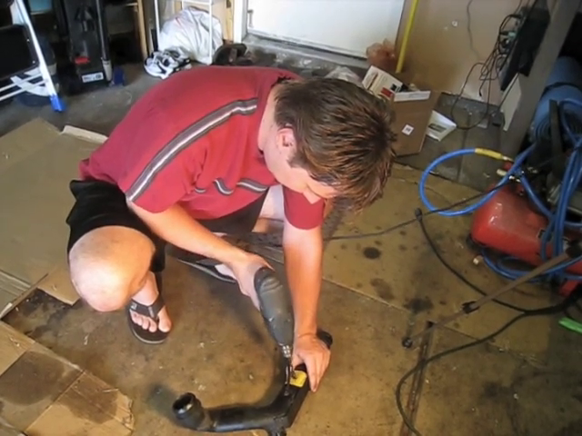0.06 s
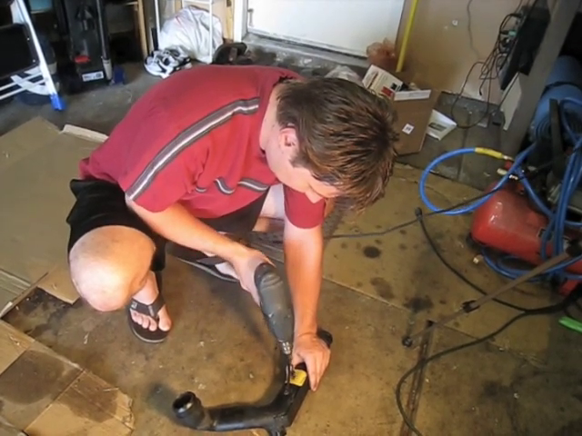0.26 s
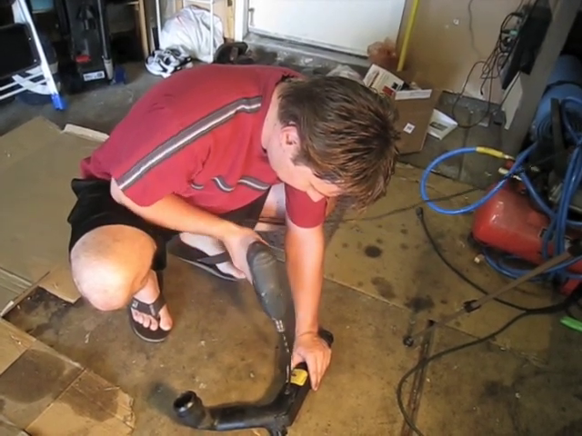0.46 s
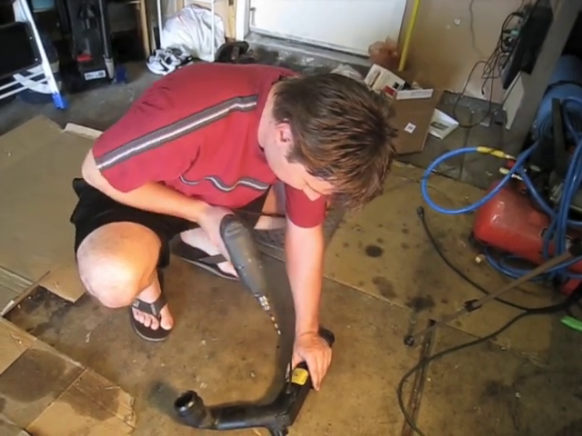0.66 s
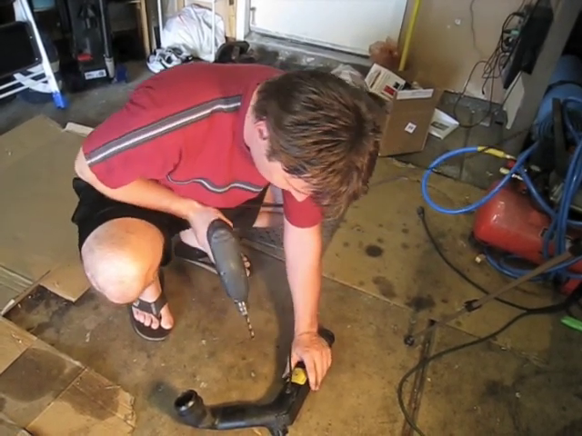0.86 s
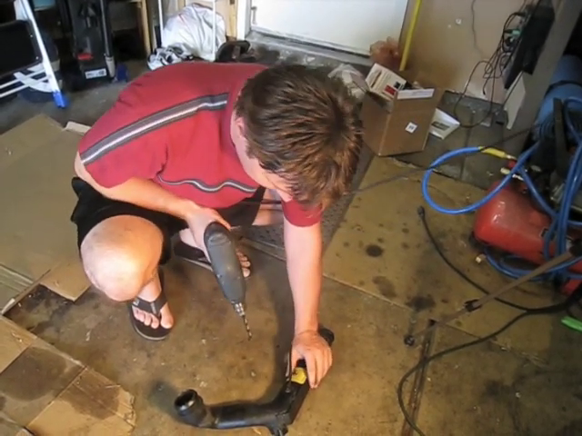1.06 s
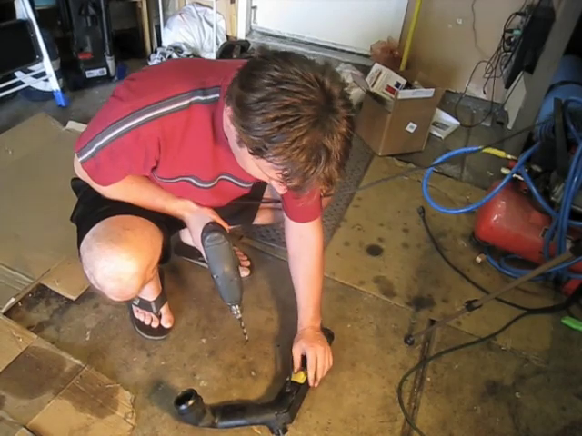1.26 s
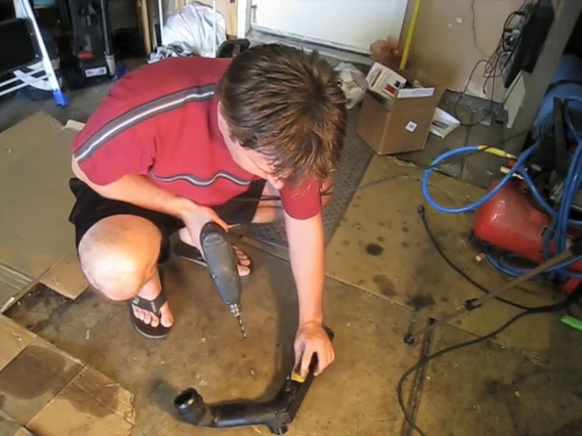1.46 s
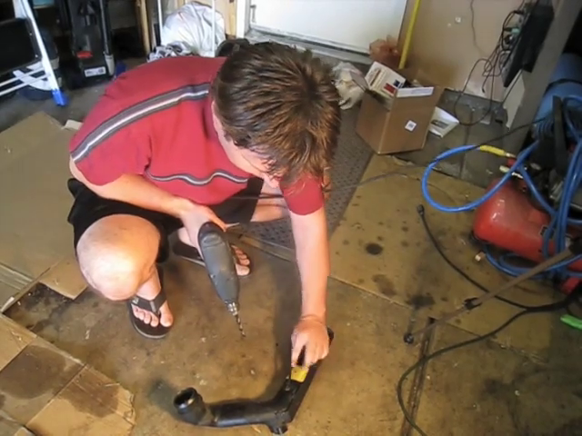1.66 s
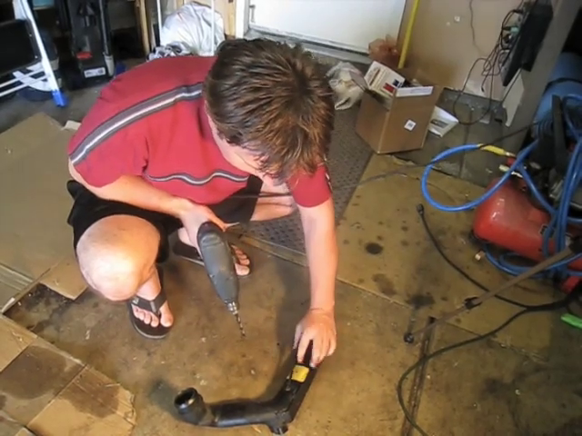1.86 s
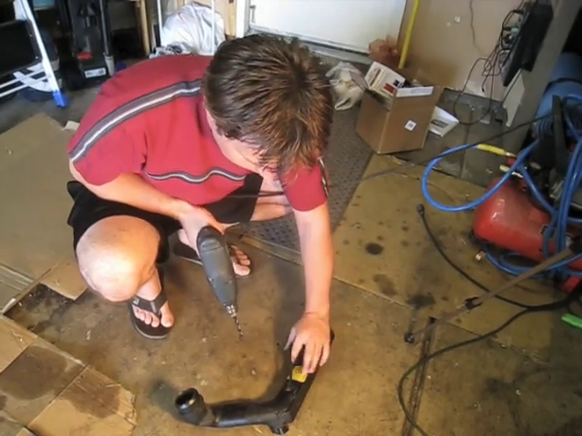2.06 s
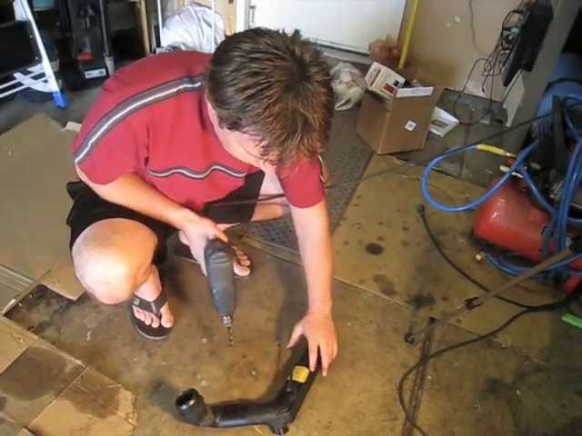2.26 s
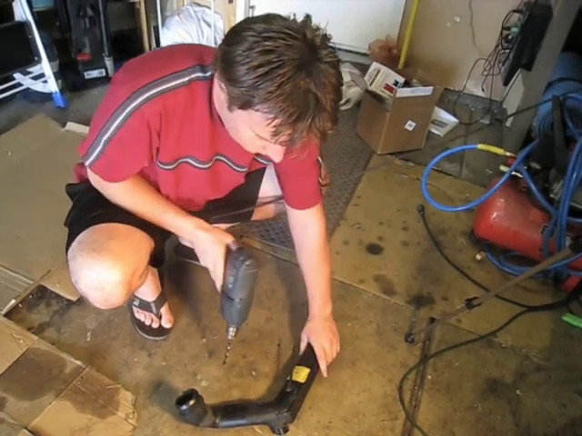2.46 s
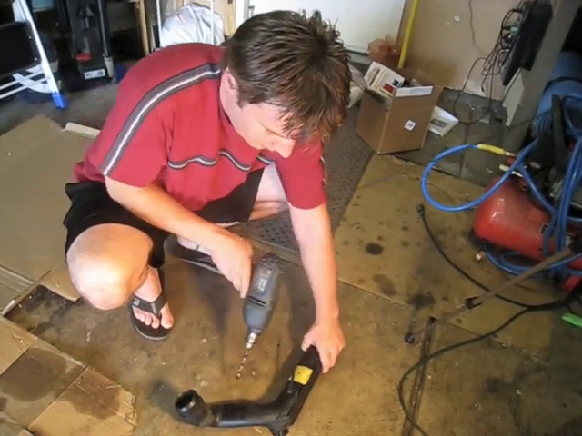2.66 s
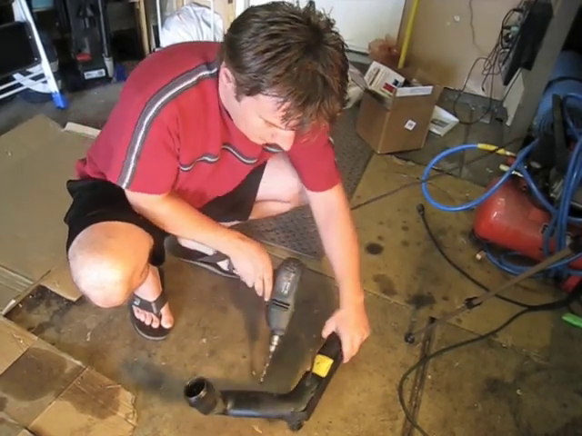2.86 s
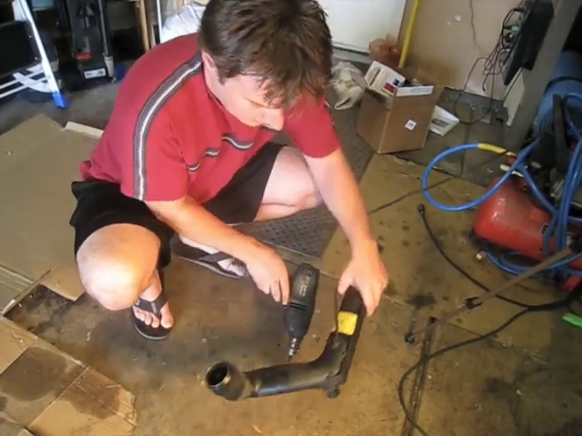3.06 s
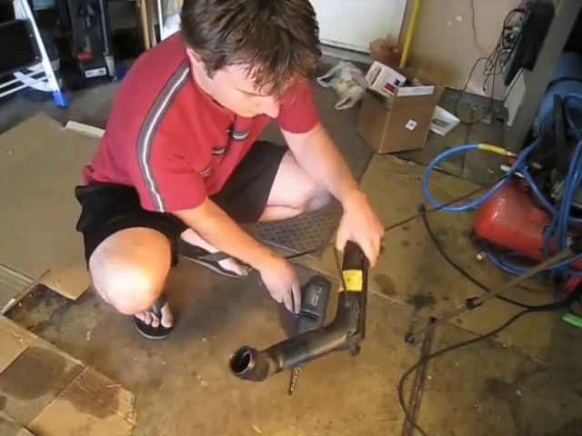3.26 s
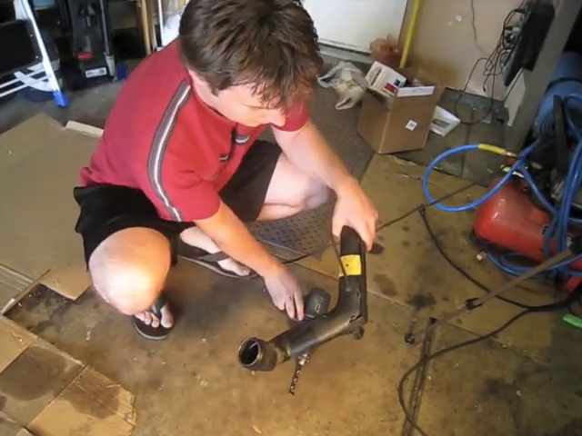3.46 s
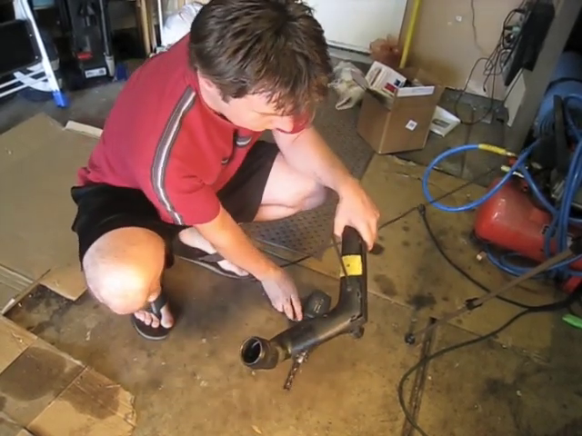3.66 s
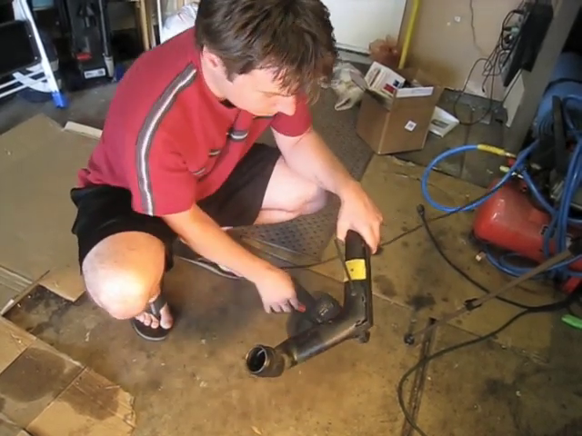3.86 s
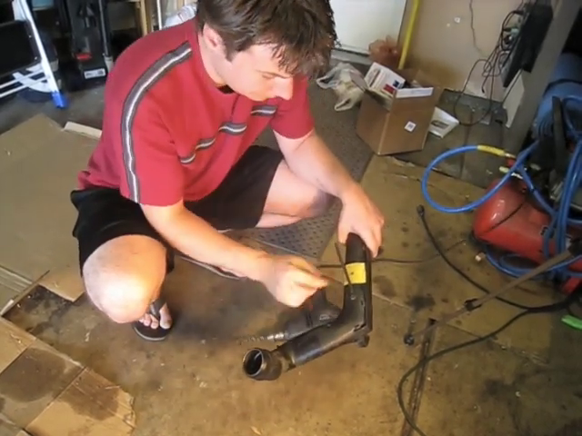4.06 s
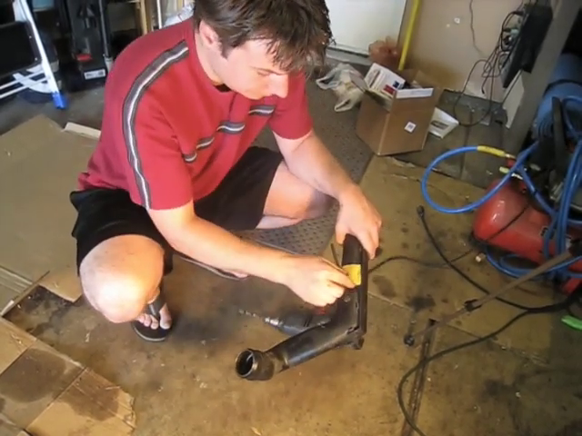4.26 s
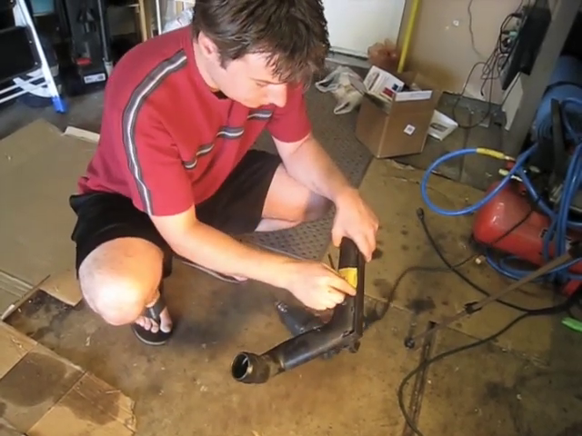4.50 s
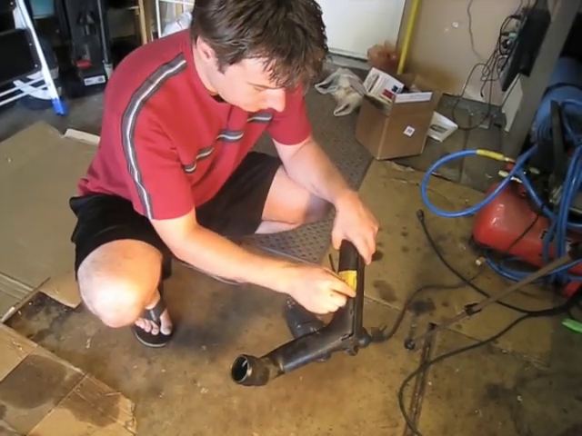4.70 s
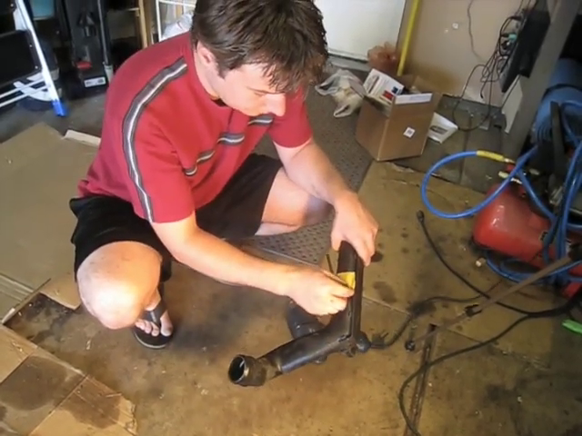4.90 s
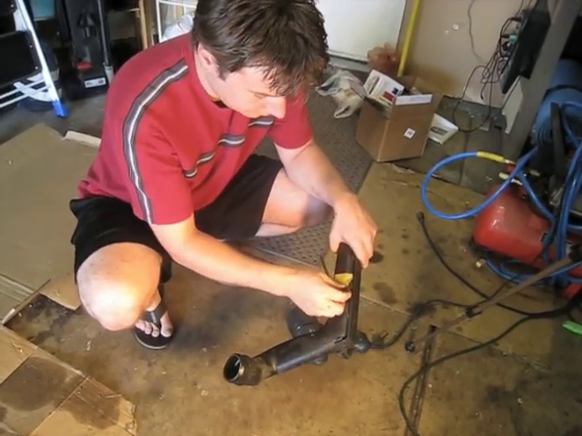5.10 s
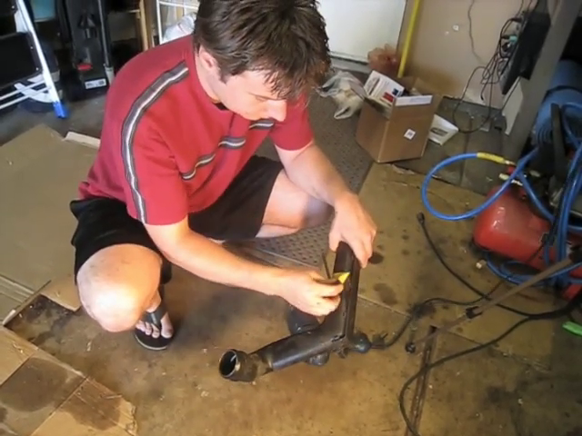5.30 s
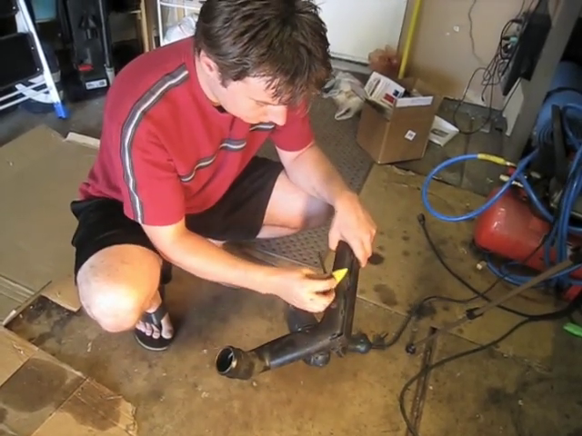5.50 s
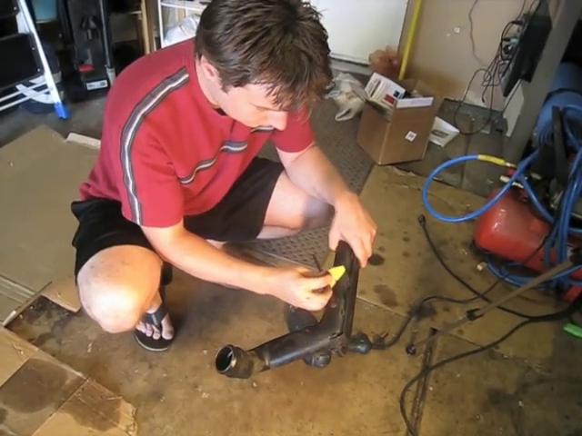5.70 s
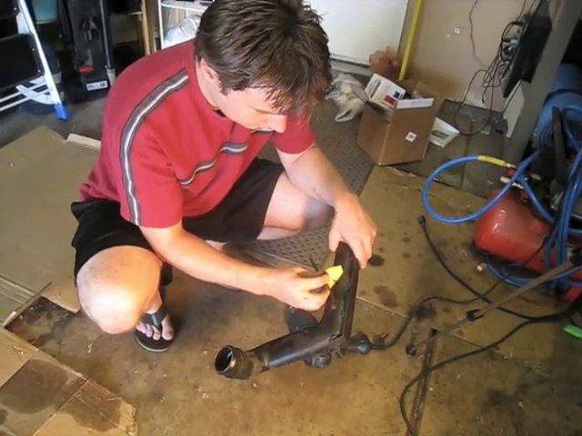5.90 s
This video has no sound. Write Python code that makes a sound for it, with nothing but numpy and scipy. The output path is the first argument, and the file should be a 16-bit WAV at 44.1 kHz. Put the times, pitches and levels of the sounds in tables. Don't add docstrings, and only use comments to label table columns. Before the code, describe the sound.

An electric drill whines and rattles, races free and coasts down, then is set on concrete with clatter before a hollow plastic pipe knocks and scrapes.

```python
import sys
import numpy as np
from scipy import signal
from scipy.io import wavfile

SR = 44100
rng = np.random.default_rng(int(sys.argv[2]) if len(sys.argv) > 2 else 0)


def unload_wav(signal):
    wavfile.write(
        sys.argv[1],
        SR,
        np.round(np.clip(np.atleast_2d(signal).T, -1, 1) * 32767).astype(np.int16),
    )


def how_loud(loudness_db):
    steps = np.asarray(loudness_db, float) / 20
    return 10 ** steps


N = 261954

# (time [s], level [dB])
DRILL_LEVEL = [
    (0.0, -23),
    (0.052, -24),
    (0.07, -19.5),
    (0.154, -19),
    (0.438, -24.5),
    (0.654, -29.5),
    (0.838, -31.5),
    (0.994, -43),
    (1.12, -63),
]
# (time [s], loss [dB], half width [s])
BIT_SNAGS = [
    (0.132, 3.7, 0.0095),
    (0.438, 1.45, .01),
    (.52, -2.5, 0.054),
]
# (multiple of tooth rate [1], level [dB])
TOOTH_HARMONICS = [(1, 0), (2, -1.5), (4, -2), (5, 4), (6, 2), (7, 2), (8, 2.5), (9, 0), (10, -6), (11, 0),
                   (12, 6.5), (13, 0.5), (14, 2), (15, -3), (16, -6), (18, -5), (20, 7)]
# (frequency [Hz], response [dB])
CASING_RADIATION = [(450, -26), (980, 1.5), (1500, -19), (2350, 9.5), (3400, 5.5), (3950, 0.5), (4800, 10),
                    (6800, -2.5), (10000, -9), (14000, -22)]
# (frequency [Hz], width [Hz], level [dB])
CASING_MODES = [(972, 46, -6), (1420, 45, -8), (2530, 60, -0.5), (3116, 16, 6.5), (4480, 83, 6),
                (4930, 43, -17.5), (5670, 130, -18.5), (6540, 59, -16), (7700, 61, -9), (9600, 78, -3.5),
                (11270, 210, 2.5)]
# (frequency [Hz], density [dB per Hz])
GEAR_SPECTRUM = [(88, -60), (150, -46.5), (352, -18.5), (786, -15), (969, -12), (1310, -3), (1780, -5.5),
                 (2460, 1), (4680, -3), (7000, -37.5), (9100, -32), (15400, -120)]
# (frequency [Hz], density [dB per Hz])
FAN_SPECTRUM = [(2940, -10.5), (5000, -3.5), (5940, 1.5), (6660, -6), (7190, -5), (11600, -7.5),
                (15100, -10), (15700, -21)]

# (frequency [Hz], level [dB], t60 [s])
TOOL_MODES = [(1541, -8, 0.012), (2220, -19.5, 0.019), (2520, -8, 0.0154), (2950, -3.5, .018),
              (3400, -6.5, 0.0127), (4230, 7, 0.015), (4567, -3, 0.0254), (4728, -4, 0.028)]
# (frequency [Hz], level [dB], t60 [s])
CHUCK_MODES = [(6029, -2, .02), (7214, -2, .02), (7607, -2, .02), (8258, -6, .015), (9860, -5, .015),
               (10310, -3, .015), (11470, -5, .012), (11900, -6, .012)]
# (frequency [Hz], level [dB], t60 [s])
PIPE_MODES = [(460.5, 3, 0.0395), (642, -6, 0.039), (885, -17.5, 0.0095), (1020, 10, 0.0276),
              (1205, -0.5, 0.0106), (1295, -17, .02), (1470, -24.5, 0.013)]
# (frequency [Hz], level [dB], t60 [s])
AIR_MODES = [(145, 0.5, 0.139), (284.2, -9, 0.18)]

# (time [s], peak level [dB], air-column thud [dB])
TOOL_DOWN = [
    (3.3081, -11, -51),
    (3.3659, -13, -53),
    (3.3775, -29, -55),
    (3.397, -17, -53),
    (3.4198, -28, -58),
]
PIPE_RATTLE = [
    (3.5239, -3, -49),
    (3.552, -13, -37),
    (3.561, -15.5, -30.5),
    (3.567, -13, -25.5),
    (3.5842, -27, -36),
]
PIPE_END = [
    (3.7521, -19.5, -47),
    (3.7637, -21.5, -28.5),
    (3.7785, -26, -34),
    (3.7949, -26.5, -38),
    (3.932, -21, -31),
    (3.9451, -18.5, -43),
    (3.9605, -27, -34.5),
]
HAND_TAPS = [
    (2.2662, -44, -62.5),
    (2.3567, -47, -65),
    (2.4544, -36, -59),
    (4.4923, -30, -56.5),
    (4.5154, -31.5, -45.5),
    (4.611, -26, -51.5),
    (4.6233, -31, -42),
    (4.798, -37, -52),
]
TICKS = [
    (3.3128, -21, -55),
    (3.537, -24.5, -25),
    (3.714, -32.5, -53),
    (4.002, -34, -60),
]
BIT_SNAPS = [
    (.295, -13.5, -66.5),
    (.36, -16.5, -53),
    (.458, -13.5, -62),
]
# (chuck level [dB], pipe wall level [dB])
OBJECT_COLOURS = [
    (-11.5, -25),
    (-11, -17),
    (-20, -7.5),
    (-20, -7.5),
    (9.5, -18),
    (-15.5, -23.5),
]
# (time [s], peak level [dB], frequency [Hz], t60 [s])
SOFT_BUMPS = [
    (2.629, -41.5, 460, 0.084),
    (2.644, -40, 410, 0.12),
    (3.722, -31, 145, 0.203),
    (3.815, -30, 150, 0.086),
    (3.884, -34.5, 143, 0.145),
    (3.992, -32.5, 148.3, 0.162),
    (4.038, -40, 1020, 0.156),
    (4.55, -36.5, 145, 0.153),
    (4.883, -32.5, 894, 0.078),
]
# (time [s], peak level [dB], frequency [Hz], t60 [s])
STEEL_PINGS = [
    (3.313, -20.5, 4970, 0.046),
    (3.946, -27, 4750, .03),
    (3.911, -36.5, 4750, 0.03),
    (4.35, -41, 5340, 0.075),
    (4.437, -36.5, 3580, 0.22),
    (4.53, -48.5, 3590, .3),
    (4.61, -48, 3590, 0.25),
    (4.802, -44, 3585, 0.21),
    (4.82, -44.5, 3585, 0.39),
    (4.925, -46, 3250, .04),
]

# (time [s], peak level [dB], 20 dB rise [s], 20 dB fall [s])
RUB_STROKES = [
    (1.23, -47, .12, 0.2),
    (1.68, -50, 0.2, 0.1),
    (2.09, -46.5, 0.04, 0.0047),
    (2.36, -49, .035, 0.324),
    (2.6, -49.5, 0.2741, 0.4332),
]
# (time [s], peak level [dB], 20 dB rise [s], 20 dB fall [s])
SLIDE_STROKES = [
    (3.96, -35, 0.029, 0.583),
    (4.25, -41.5, .1, 0.25),
    (4.44, -39, 0.138, .08),
    (4.52, -40.5, 0.13, 0.1),
    (4.61, -46, 0.034, 0.58),
    (4.8, -48.5, .03, .3),
    (5.16, -52.5, .15, 1.6),
    (5.7, -55, 1.4, 0.18),
]
# (time [s], peak level [dB], 20 dB rise [s], 20 dB fall [s])
DRAG_STROKES = [
    (3.97, -43, 0.023, 0.036),
    (4.064, -40, 0.023, 0.76),
    (4.17, -40, 0.17, 0.168),
    (4.262, -39, 0.067, 0.23),
    (4.438, -36, 0.071, 0.124),
    (4.512, -39.5, 0.21, .08),
    (4.618, -38.5, 0.06, 0.044),
    (4.64, -45.5, .02, 0.263),
    (4.888, -44, .02, .07),
]
# (frequency [Hz], density [dB per Hz])
RUSTLE_SPECTRUM = [(710, -39), (1200, -33), (1370, 2), (1830, -4.5), (3740, -3.5), (4080, -2.5),
                   (11900, -14), (16000, -19)]
# (frequency [Hz], density [dB per Hz])
SLIDE_SPECTRUM = [(940, -36), (1600, -4), (2850, -13), (3630, 2.5), (3960, -3.5), (5180, -3), (7120, -8),
                  (10600, -8), (14100, -11), (16000, -13.5)]

# (frequency [Hz], t60 [s])
GARAGE_DECAY = [(150, 0.497), (1000, 0.26), (4000, 0.266), (12000, 0.19)]
# (frequency [Hz], density [dB per Hz])
FLOOR_SPECTRUM = [(15, -61), (25, -43), (56, -7.5), (87, -14.5), (117, -3.5), (149, -14), (285, -9.5),
                  (463, -11.5), (988, -9), (1560, -14.5), (3080, -20.5), (5570, -27), (11000, -31),
                  (11900, -38), (16000, -36)]
# (time [s], peak level [dB])
HUM_SWELLS = [(.38, -54.5), (.81, -55), (1.27, -56), (1.55, -55.5), (1.971, -56), (2.29, -53), (2.75, -50),
              (2.9, -48), (3.33, -51.5), (3.99, -53), (4.5, -62), (5.15, -56.5), (5.5, -51.5), (5.9, -55.5)]
# (frequency [Hz], width [Hz], level [dB])
WHISTLE_TONES = [(301.15, 8.2, -67), (900.3, 12.6, -62.5), (3000, 12, -71), (12200, 79, -73.5),
                 (14411, 8, -84)]

EDGES = 22 * 2 ** np.arange(0, 9.7, 1 / 3)

LOADED_HZ, LOADED_RISE_HZ_PER_S, FREE_HZ = 463.2, 520, 982.7
THROUGH_S, SPIN_UP_S, RELEASE_S, COAST_S = .24, .075, .41, .48
CLEAN_LOADED_DB, CLEAN_FREE_DB, CLEAN_WAVER_DB = -18.5, -12, 2
HISS_LOADED_DB, HISS_FREE_DB, HISS_SLOWING_DB = -6.5, -2.5, 0.5
FLAWS_DB, CASING_SPREAD = 11, 1.3
DRAG_WIDTH_HZ = 230
DRAG_BOOM_HZ, DRAG_BOOM_WIDTH_HZ, DRAG_BOOM_DB = 149, 42.6, -11.5
FIDGET_DB, FIDGET_FROM_S, FIDGET_TO_S = -65.5, 1.5, 3.3
HUM_HZ, HUM_RISE_S, HUM_FALL_S, HUM_LOW_DB = 117.5, 0.396, 0.24, -61
FLOOR_DB, CUTOFF_HZ = -48.5, 15950


def drill():
    tooth_hz, free, hiss_db = motor()
    clean_db = CLEAN_LOADED_DB + (CLEAN_FREE_DB - CLEAN_LOADED_DB) * free + CLEAN_WAVER_DB * drift(10.5)
    teeth = np.cumsum(tooth_hz * (1 + 0.0022 * drift(25))) / SR
    wobble = how_loud(0.5 * np.sin(2 * np.pi * teeth / 40))

    worn = rng.standard_normal((2, 240))
    flaws = worn[:, (teeth / 4 % 1 * worn.shape[1]).astype(int)]
    flawed = how_loud(clean_db + FLAWS_DB)
    rattle = rms_one(grains(9000, spread_db=3.0)) + flawed * flaws

    ringing = 0
    for k, (hz, width, db) in enumerate(CASING_MODES):
        mode = resonate(rattle[k % 2], hz, CASING_SPREAD * width) / np.sqrt(width)
        ringing = ringing + how_loud(db) * (-1) ** k * mode
    grind = colour(rattle, GEAR_SPECTRUM, patchy_db=2.0, rate=15)
    casing = (grind + how_loud(-5.5) * rms_one(ringing)) / np.hypot(1, flawed)

    whine = 0
    for k, db in TOOTH_HARMONICS:
        harmonic_db = db + at_hz(CASING_RADIATION, k * tooth_hz) + 5.2 * drift(22)
        whine = whine + how_loud(harmonic_db) * np.sin(2 * np.pi * k * teeth)
    hiss = colour(rattle, FAN_SPECTRUM, patchy_db=1.5, rate=23) / np.hypot(1, flawed)
    together = casing + how_loud(clean_db - 14.5) * whine + how_loud(hiss_db) * hiss
    return wobble * snags() * gain_curve(DRILL_LEVEL) * together


def motor():
    t = np.arange(N) / SR
    free = np.clip((t - THROUGH_S) / SPIN_UP_S, 0, 1)
    free = free * free * (3 - 2 * free)
    loaded_hz = LOADED_HZ + LOADED_RISE_HZ_PER_S * np.minimum(t, RELEASE_S)
    driven_hz = (1 - free) * loaded_hz + free * FREE_HZ
    coasted = np.clip(t - RELEASE_S, 0, 1) / COAST_S
    hiss_db = HISS_LOADED_DB + (HISS_FREE_DB - HISS_LOADED_DB) * free - HISS_SLOWING_DB * coasted / np.log(2)
    return driven_hz * np.exp(-coasted), free, hiss_db


def snags():
    t = np.arange(N) / SR
    return how_loud(-sum(loss_db * np.exp(-((t - s) / half_s) ** 2) for s, loss_db, half_s in BIT_SNAGS))


def knocks():
    s, db, _, top, body = contacts()
    tool = strike(s, db - 19, TOOL_MODES, scatter_db=3)
    chuck = strike(s, db + top - 13, CHUCK_MODES, scatter_db=3)
    pipe = strike(s, db + body - 14, PIPE_MODES, scatter_db=2)
    tool_crack = crack(s, db + 0.5, 1400, 4650, t60=0.0284)
    chuck_crack = crack(s, db + top - 9.0, 6940, 11800, t60=0.0513)
    pipe_crack = crack(s, db + body + 6, 413, 1310, t60=0.045)
    return band(tool + chuck + pipe + tool_crack + chuck_crack + pipe_crack, 205, 16000)


def thuds():
    s, _, low, _, _ = contacts()
    soft = sum(ring(at, peak_db, hz, t60) for at, peak_db, hz, t60 in SOFT_BUMPS)
    boom = band(strike(s, low, AIR_MODES, scatter_db=3.5) + soft, 143.2, 590)
    return boom + sum(ring(at, peak_db, hz, t60) for at, peak_db, hz, t60 in STEEL_PINGS)


def contacts():
    objects = [TOOL_DOWN, PIPE_RATTLE, PIPE_END, HAND_TAPS, TICKS, BIT_SNAPS]
    return np.transpose([row + tint for rows, tint in zip(objects, OBJECT_COLOURS) for row in rows])


def strike(s, db, modes, scatter_db):
    luck = rng.normal(0, scatter_db, (len(s), len(modes)))
    return sum(ring(s, db + mode_db + luck[:, k], hz, t60) for k, (hz, mode_db, t60) in enumerate(modes))


def crack(s, db, low_hz, high_hz, t60):
    clicks = np.full(N, 1e-18)
    clicks[np.round(s * SR).astype(int)] = how_loud(db)
    dying = signal.lfilter([1], [1, -how_loud(-60 / (t60 * SR))], clicks)
    return band(dying * rng.standard_normal(N), low_hz, high_hz)


def handling():
    fine, chatter = grains(7000, spread_db=0.0), grains(1600, spread_db=1.0)
    fidget = gain_curve([(FIDGET_FROM_S, FIDGET_DB), (FIDGET_TO_S, FIDGET_DB)])
    rustle = (strokes(RUB_STROKES) + fidget) * colour(fine, RUSTLE_SPECTRUM, patchy_db=2.0, rate=12.1)
    slide = strokes(SLIDE_STROKES) * colour(fine, SLIDE_SPECTRUM, patchy_db=1.5, rate=47)
    wall = 0
    for k, (hz, db, _) in enumerate(PIPE_MODES[1:]):
        wall = wall + how_loud(1.14 * db + 1.92 * drift(25.0)) * resonate(chatter[k % 2], hz, DRAG_WIDTH_HZ)
    air = resonate(chatter[0], DRAG_BOOM_HZ, DRAG_BOOM_WIDTH_HZ)
    drag = rms_one(wall) + how_loud(DRAG_BOOM_DB) * rms_one(air)
    return rustle + slide + strokes(DRAG_STROKES) * drag


def strokes(rows, rest_db=-120):
    t = np.arange(N) / SR
    lines = []
    for s, db, rise_s, fall_s in rows:
        lines.append(db - 20 * np.where(t < s, (s - t) / rise_s, (t - s) / fall_s))
    return how_loud(np.maximum(np.max(lines, axis=0), rest_db))


def garage(x):
    t = np.arange(SR // 2) / SR
    white = rng.standard_normal((2, len(t)))
    tail = 0
    for k, (low, high) in enumerate(zip(EDGES[10:], EDGES[11:])):
        tail = tail + band(white[k % 2], low, high) * how_loud(-60 * t / at_hz(GARAGE_DECAY, low))
    tail = tail * np.clip(t / 0.011, 0, 1)
    return signal.fftconvolve(x, tail / np.sqrt(np.sum(tail ** 2)))[:N]


def background():
    white = rng.standard_normal((2, N))
    swells = strokes([(s, db, HUM_RISE_S, HUM_FALL_S) for s, db in HUM_SWELLS], HUM_LOW_DB)
    turns = np.cumsum(HUM_HZ + 1.616 * drift(3.165)) / SR
    hum = np.sqrt(2) * swells * np.sin(2 * np.pi * turns)
    whistles = 0
    for hz, width, db in WHISTLE_TONES:
        narrow = resonate(resonate(white[0], hz, width), hz, width)
        whistles = whistles + how_loud(db) * rms_one(narrow)
    return how_loud(FLOOR_DB) * colour(white, FLOOR_SPECTRUM, patchy_db=0.54, rate=1.63) + hum + whistles


def rms_one(x):
    return x / np.sqrt(np.mean(x ** 2) + 1e-20)


def gain_curve(rows):
    t = np.arange(N) / SR
    s, db = np.transpose(rows)
    fade = np.interp(t, [s[0] - .02, s[0], s[-1], s[-1] + .02], [0, 1, 1, 0])
    return fade * how_loud(np.interp(t, s, db))


def at_hz(points, hz):
    points_hz, values = np.transpose(points)
    return np.interp(np.log(hz), np.log(points_hz), values)


def drift(rate):
    r = np.exp(-80 * np.pi * rate / SR)
    slow = signal.lfilter([1], [1, -2 * r, r * r], rng.standard_normal(N // 40 + 2002))[2000:]
    return np.interp(np.arange(N) / 40, np.arange(len(slow)), rms_one(slow))


def band(x, low_hz, high_hz):
    return signal.sosfilt(signal.butter(2, [low_hz, high_hz], "band", fs=SR, output="sos"), x)


def colour(sources, spectrum, patchy_db, rate):
    out = 0
    for k, (low, high) in enumerate(zip(EDGES, EDGES[1:])):
        hz = np.sqrt(low * high)
        if spectrum[0][0] <= hz <= spectrum[-1][0]:
            gain = how_loud(at_hz(spectrum, hz) + patchy_db * drift(rate))
            out = out + gain * band(sources[k % 2], low, high)
    return rms_one(out)


def grains(per_s, spread_db):
    sizes = how_loud(spread_db * np.minimum(rng.exponential(1, (2, N)), 4)) * rng.choice([-1, 1], (2, N))
    return sizes * (rng.random((2, N)) < per_s / SR) + 1e-18


def resonate(x, hz, width):
    r = np.exp(-np.pi * width / SR)
    poles = [1, -2 * r * np.cos(2 * np.pi * hz / SR), r * r]
    return signal.lfilter(np.array([1, 0, -1]) * (1 - r * r) / 2, poles, x)


def ring(s, db, hz, t60):
    clicks = np.full(N, 1e-18)
    clicks[np.round(np.atleast_1d(s) * SR).astype(int)] = how_loud(db)
    r, w = how_loud(-60 / (t60 * SR)), 2 * np.pi * hz / SR
    return signal.lfilter([0, np.sin(w)], [1, -2 * r * np.cos(w), r * r], clicks)


def scene():
    hits = knocks()
    return (hits + how_loud(-3.5) * garage(hits) + thuds() + drill() + handling() + background())[None]


def low_pass(x):
    return signal.sosfilt(signal.butter(12, 16300, fs=SR, output="sos"), x)


def record(dry):
    steep = signal.cheby2(18, 60, CUTOFF_HZ, fs=SR, output="sos")
    return low_pass(signal.sosfilt(steep, dry))


dry = scene()
out = record(dry)
unload_wav(out)
```